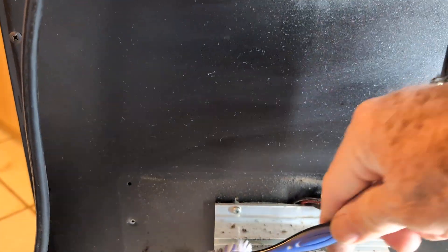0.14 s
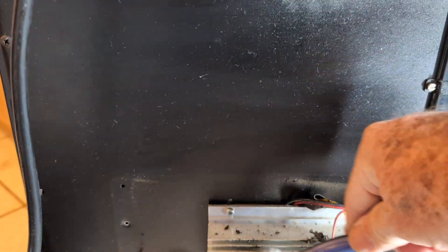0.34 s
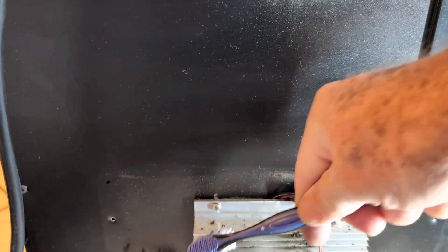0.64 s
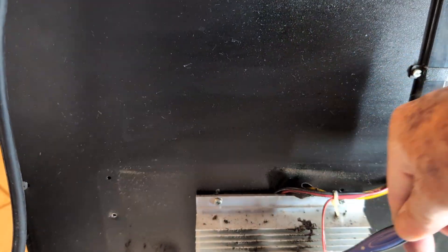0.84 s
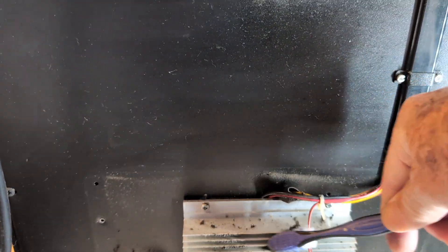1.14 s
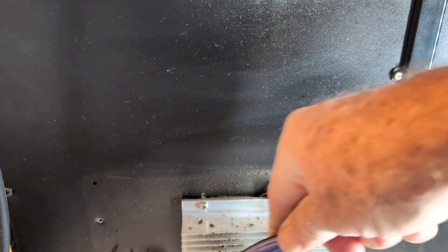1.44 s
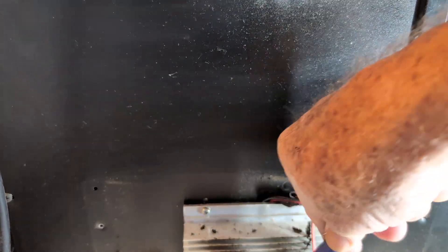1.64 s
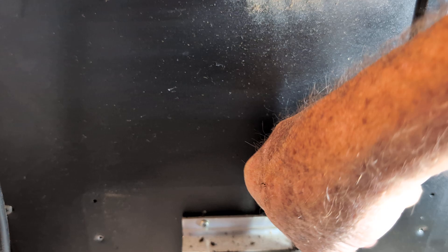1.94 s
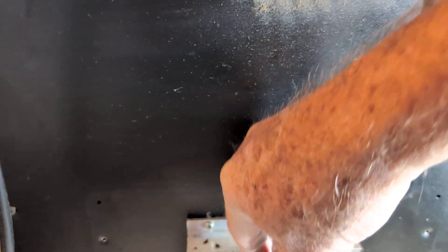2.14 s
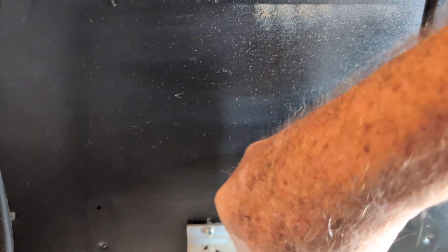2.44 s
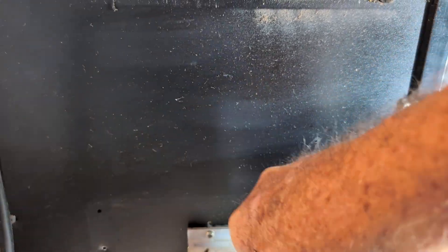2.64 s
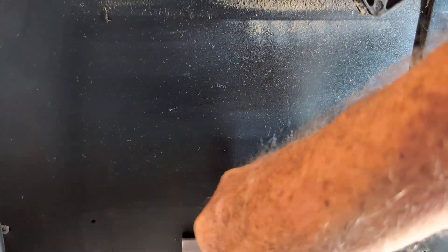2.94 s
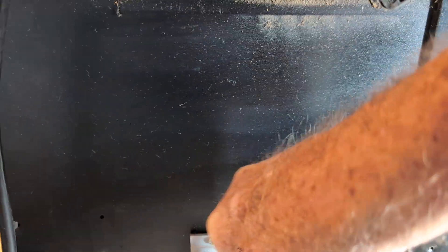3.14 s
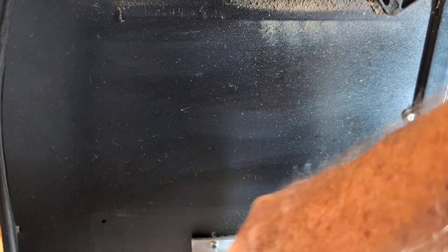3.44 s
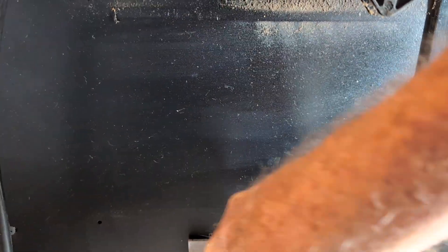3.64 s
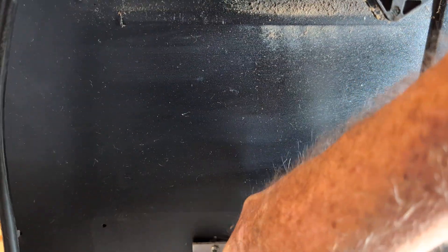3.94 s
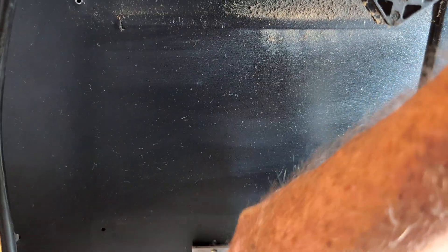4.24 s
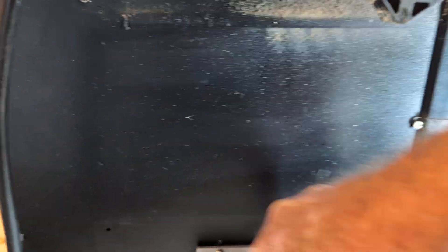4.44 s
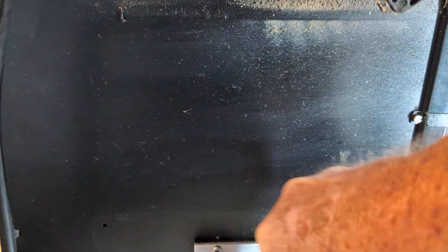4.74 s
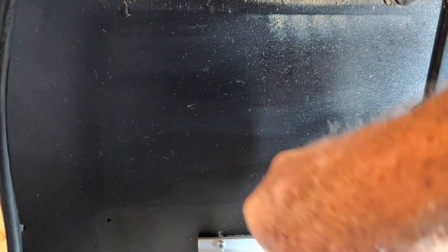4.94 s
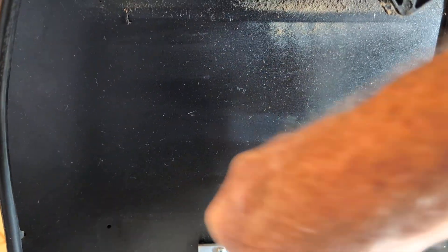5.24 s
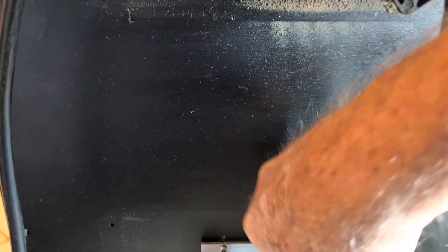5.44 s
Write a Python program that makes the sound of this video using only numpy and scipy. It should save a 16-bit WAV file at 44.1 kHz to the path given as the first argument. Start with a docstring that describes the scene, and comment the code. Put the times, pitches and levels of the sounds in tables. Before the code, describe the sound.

A small brush rasps and hisses over thin metal fins, slow strokes turning quick, above a steady low motor hum.

```python
"""A brush hisses and rasps over metal fins: a faint touch, some longer strokes, then mostly quick ones.
It is a toothbrush on the aluminium fins of a heat sink inside a sheet-metal cabinet, made of flicking noise.
Single fins sing as narrow bands of noise, the plastic head clicks on metal (noise bursts and ringing modes),
and the panel drones and booms when the hand bumps it.
Behind it all a motor hums low and steady in the workshop, with rumble, moving air and a thin fan whine."""
import sys
import numpy as np
from scipy import signal
from scipy.fft import rfft, irfft, next_fast_len
from scipy.io import wavfile
from scipy.ndimage import uniform_filter1d, map_coordinates

SR = 44100
rng = np.random.default_rng(int(sys.argv[2]) if len(sys.argv) > 2 else 0)


def generate_wav(signal):
    """Clip the signal to [-1, 1] and save it as 16-bit WAV at the path in sys.argv[1]."""
    frames = np.transpose(np.atleast_2d(signal))
    scaled = np.clip(frames, -1, 1) * 32767
    pcm = np.round(scaled).astype(np.int16)
    wavfile.write(sys.argv[1], SR, pcm)


N = 245842  # length in samples
TIME = np.arange(N) / SR  # s
TOP_HZ = 15850  # nothing is kept above this


def amp(db):
    """Turn decibels into a gain."""
    return 10 ** (np.asarray(db) / 20)


def unit(x):
    """Scale a sound to rms 1."""
    return x / np.sqrt(np.mean(x ** 2) + 1e-20)


def along(points, hz):
    """Read a curve of (f/Hz, value) points on a logarithmic frequency axis."""
    f, v = np.transpose(points)
    return np.interp(np.log(hz + 1), np.log(f + 1), v)


def curves(rows):
    """Draw straight lines between timed rows: one value per sample for each column after the time."""
    s, *columns = np.transpose(sorted(map(tuple, rows)))
    return [np.interp(TIME, s, column) for column in columns]


def wobble(rate):
    """Draw a smooth random curve with this many random points a second."""
    knots = rng.standard_normal(int(N * rate / SR) + 4)
    return map_coordinates(knots, [TIME * rate])


def filtered(x, response):
    """Change each frequency of x by a response given as a function of frequency in Hz."""
    n = x.shape[-1]
    m = next_fast_len(n + 8192)  # spare room for the filter's tail
    spectrum = rfft(x, m) * response(np.fft.rfftfreq(m, 1 / SR))
    return irfft(spectrum, m)[..., :n]


def add(track, s, sound):
    """Mix a sound into a track at time s."""
    part = track[round(s * SR):][:len(sound)]
    part += sound[:len(part)]


def rush(spectrum):
    """Make stereo noise of rms 1 that comes from all around, with nearly equal sides in the bass."""
    # how alike the two sides are: f/Hz, likeness (1 = the same)
    alike = [(60, 0.98), (130, 1), (280, 0.94), (550, 0.69), (1100, 0.043), (4000, 0.032)]

    def mid_side(hz):
        turn = np.arccos(np.clip(along(alike, hz), -1, 1)) / 2
        return amp(along(spectrum, hz)) * [np.cos(turn), np.sin(turn)]

    mid, side = filtered(rng.standard_normal((2, N)), mid_side)
    return unit(np.array([mid + side, mid - side]))


def workshop():
    """Motor hum of steady sine tones over a low rumble, moving air and a thin fan whine, all shaped noise."""
    # the motor's shaft line, then mains and frame tones: f/Hz, rms level/dB
    hum = [(57.45, -22), (42.3, -48.5), (81.4, -56), (87.5, -52.5), (121.4, -58), (142.3, -58), (169, -63),
           (287, -60), (459, -68), (802, -72.5), (862, -68.5)]
    # colours of the three noises: f/Hz, relative level per Hz/dB
    rumble = [(15, -38), (35, -21), (62, 9.5), (85, 6), (110, -1), (170, -14.5), (230, -50.5)]
    air = [(76, -32), (130, 1), (172, 2), (215, -9.5), (302, -5.5), (350, -7.5), (746, -12), (1200, -15.5),
           (2000, -19.5), (2600, -21), (4200, -28), (6500, -33), (10000, -58), (15800, -69)]
    fan_whine = [(2000, -65), (2440, -11.5), (2546, -1), (2650, -19), (3200, -64)]
    tones = sum(amp(db) * np.sqrt(2) * np.sin(2 * np.pi * (hz * TIME + rng.random())) for hz, db in hum)
    return tones + amp(-45.5) * rush(rumble) + amp(-52.5) * rush(air) + amp(-69.5) * rush(fan_whine)


def panel(drone_gain, attack_s):
    """The sheet metal drones under the strokes and booms softly in its own modes when bumped."""
    # the hand bumps the panel: t/s, relative level/dB
    bumps = [(0.726, -34), (0.765, -38), (2.384, -32.5), (2.752, -36), (2.792, -26), (2.824, -27.5),
             (3.04, -37), (3.574, -48), (3.691, -38), (4.846, -33)]
    # how the sheet rings: f/Hz, relative level/dB, time to fall 60 dB/s
    panel_modes = [(182, -5, 0.092), (245, -5, 0.11), (279, 4.5, 0.071), (337, -24, 0.044),
                   (635, -4, 0.024)]
    # colour of the drone: f/Hz, relative level per Hz/dB
    drone_colour = [(100, -39.5), (200, -10), (285, 2.5), (380, -4.5), (550, -11), (800, -13), (1400, -22),
                    (3000, -68)]
    hold_db = -56.5  # drone under the steadying hand, before the left-right balance
    booms = np.zeros(N)
    t = np.arange(SR // 4) / SR
    for s, db in bumps:
        ring = 0
        for hz, level, t60 in panel_modes:
            bent_hz = hz * (1 + rng.normal(0, 0.027))  # each bump rings at slightly different pitches
            ring = ring + amp(level - 60 * t / t60) * np.sin(2 * np.pi * bent_hz * t)
        add(booms, s, amp(db - 1.0) * ring * (1 - np.exp(-t / attack_s)))
    drone = np.hypot(drone_gain, amp(hold_db)) * rush(drone_colour)
    return (booms + drone) * amp([[-.8], [.8]])  # a little louder on the right


def clicks(ring_db, attack_s):
    """Plastic on metal: a short noisy crack, and the fin modes that lie in its band."""
    # the head clicks on metal: t/s, relative level/dB, centre f/Hz, width/octaves, crack's 60 dB fall/s
    taps = [(0.152, -46, 2880, 0.77, .025), (0.754, -32, 7670, 0.2, 0.024),
            (0.754, -39.5, 4570, 0.57, 0.028), (1.089, -42, 830, 0.55, 0.095),
            (1.474, -37.5, 3060, 1.8, 0.028), (1.477, -37.5, 700, 0.8, 0.064),
            (1.953, -43.5, 4200, 0.68, .02), (2.316, -44, 790, 0.97, 0.057), (2.316, -47, 2960, 0.74, .03),
            (2.604, -28, 6900, 1, 0.014), (2.6077, -23, 6500, 0.93, 0.016), (3.327, -44, 2330, 1, 0.07),
            (4.7796, -24.5, 2660, 1.5, 0.021), (4.795, -24, 8200, 0.13, 0.014),
            (4.797, -40, 2970, 1.3, 0.11), (4.824, -42, 5160, 0.39, 0.058),
            (5.051, -25.5, 8050, 0.64, 0.039), (5.338, -39.5, 7170, 2.4, 0.031)]
    # how the knocked fins ring: f/Hz, relative level/dB, time to fall 60 dB/s
    fin_modes = [(1943, -5.5, 0.1), (2910, 7, .018), (3850, -4, 0.07), (4220, -5, 0.017), (8200, -6, .045)]
    out = np.zeros(N)
    t = np.arange(SR // 6) / SR
    for s, db, centre_hz, octaves, t60 in taps:
        band = lambda hz: 1 / (1 + (np.log2((hz + 1) / centre_hz) / octaves) ** 4)
        crack = unit(filtered(rng.standard_normal(len(t)), band)) * amp(-60 * t / t60)
        ring = sum(band(hz) * amp(level - 60 * t / life) * np.sin(2 * np.pi * hz * t)
                   for hz, level, life in fin_modes)
        add(out, s, amp(db - 1.0) * (crack + amp(ring_db) * ring) * (1 - np.exp(-t / attack_s)))
    return out


def singing_fins():
    """A fin rings in narrow bands at its pitch and overtones while the bristles pass over it."""
    # single fins singing: start t/s, length/s, pitch f/Hz, level before the partial's own/dB
    singing = [(0.498, 0.23, 1125, -53), (.58, 0.16, 1480, -53), (0.636, 0.064, 2030, -51.5),
               (.895, 0.14, 1130, -51.5), (0.974, .14, 2320, -52.5), (1.234, 0.25, 1480, -47.5),
               (1.737, 0.27, 2360, -61), (2.166, 0.1, 4460, -56), (3.527, .14, 3190, -52.5),
               (3.665, 0.057, 3030, -56.5), (4.116, 0.08, 3050, -55), (4.258, .11, 3220, -59),
               (4.42, 0.16, 3200, -56), (4.584, .07, 3110, -53.5), (4.721, 0.097, 3140, -49),
               (5.05, 0.039, 3070, -49), (5.167, 0.11, 2590, -57), (5.323, 0.043, 2570, -48.5),
               (5.335, 0.48, 3380, -57.5)]
    # how any one fin rings: multiple of its pitch, width/Hz, relative level/dB
    fin_partials = [(1, 160, 2), (2.48, 350, -9.5), (6.3, 830, -2), (7.6, 2300, -0.5)]
    out = np.zeros(N)
    for start, length, pitch_hz, db in singing:
        n = round(length * SR)
        swell = np.sin(np.linspace(0, np.pi, n))
        for multiple, width_hz, partial_db in fin_partials:
            centre = multiple * pitch_hz

            def resonance(hz):
                damping = 1j * hz * width_hz
                return (damping / (centre ** 2 - hz ** 2 + damping)) ** 2

            ring = unit(filtered(rng.standard_normal(n), resonance))
            audible = centre < TOP_HZ
            add(out, start, amp(db + partial_db) * audible * ring * swell)
    return out


def flicks(rate, flick_db, clump_db, shared):
    """Bristles let go of the fin edges in tufts, over smooth friction; each side hears its own mix."""
    snaps = (rng.random((3, N)) < rate / SR) * rng.standard_normal((3, N))
    friction = rng.standard_normal((3, N)) + amp(flick_db) * unit(snaps)
    pair = np.sqrt(shared) * friction[0] + np.sqrt(1 - shared) * friction[1:]
    return unit(pair * amp(clump_db * wobble(170)))


def shifting(x, patchy_db):
    """As the brush moves on it meets other fins, so the colour drifts at random in narrow bands."""
    z = signal.stft(x, nperseg=512)[2]
    field = rng.standard_normal(z.shape)
    field = uniform_filter1d(field, size=3, axis=1)  # smooth over frequency
    field = uniform_filter1d(field, size=20, axis=2)  # smooth over time
    return signal.istft(z * amp(patchy_db * unit(field)), nperseg=512)[1][:, :N]


def scrape(near, far, excitation, patchy_db):
    """Bristle friction coloured by the resonances of the fins under the brush, rms about 1."""
    # resonances of the fin pack: f/Hz, width/Hz, lift at the near end/dB, lift at the far end/dB
    fin_pack = [(2130, 190, -1.5, -0.5), (2580, 250, -0.5, 5), (3130, 870, -5.5, 1.5), (3380, 130, -2.5, 7),
                (4330, 260, -2.5, 5), (5470, 400, 4, 4), (6590, 370, 1.5, 9), (8260, 180, 5.5, 7.5),
                (9300, 320, 4.5, 8), (10450, 430, 0.5, 7), (12700, 330, 8, 5), (14800, 500, 0, 3.5)]
    # where the brush works: t/s, place (0 = near end of the fins, 1 = far end)
    place = [(0, 0.16), (1.45, 0.14), (1.9, 0.73), (2.6, 0.69), (3.3, 0.53), (3.6, 0.96), (4.7, 0.77),
             (5.1, 0.8), (5.5, 0.84)]
    drifting = shifting(excitation, patchy_db)

    def colour(spectrum, end):
        lift = lambda hz: sum(db[end] / (1 + (2 * (hz - centre) / width) ** 2)
                              for centre, width, *db in fin_pack)
        return unit(filtered(drifting, lambda hz: amp(along(spectrum, hz) + lift(hz))))

    reach = curves(place)[0]
    return (1 - reach) * colour(near, 0) + reach * colour(far, 1)


def brush(hiss_gain, rasp_gain, brightening, tips_hz, unsteady_db):
    """Each stroke hisses at the bristle tips and rasps in the fins; harder strokes are brighter."""
    # colours at the two ends of the fins: f/Hz, relative level per Hz/dB
    hiss_near = [(3000, -42), (4100, -10.5), (4900, -16), (5600, -1), (6500, -6), (7600, -2), (9300, -1),
                 (10300, -2), (11500, -6), (12400, -6), (13800, -17.5), (14700, 4), (15800, -8)]
    hiss_far = [(3000, -46), (4100, -18.5), (4900, -8.5), (5600, -2), (6500, -8), (8100, 0.5), (9300, -7.5),
                (11000, -4), (12200, -11.5), (13600, -3), (14500, -1.5), (15800, -4)]
    rasp_near = [(350, -16), (700, -14.5), (1100, 0.5), (1500, -5.5), (2000, -2.5), (2400, -3.5),
                 (2800, -9), (3400, 4.5), (4300, -10.5), (5000, -18), (7000, -45)]
    rasp_far = [(350, -16), (700, 4.5), (1000, 4), (1400, -4), (2200, -4.5), (2700, -1.5), (3200, 1),
                (3800, -6.5), (5000, -25.5), (7000, -38)]
    # top treble as the bristles tilt: t/s, level before brightening/dB
    tip_sizzle = [(1.0, -1.5), (1.3, 2.5), (2.2, -1.5), (2.7, -1), (3.3, -1), (4.0, 4.5), (4.5, -0.5),
                  (5.1, 1.5)]
    bristles = flicks(rate=600, flick_db=-7, clump_db=1.5, shared=0.54)  # rate in snaps a second
    bristles = bristles * amp(unsteady_db * wobble(35))
    tips = scrape(hiss_near, hiss_far, bristles, patchy_db=3.5)
    top = filtered(tips, lambda hz: 1 - 1 / (1 + (hz / tips_hz) ** 8))  # the sizzle of the very tips
    hardness = hiss_gain / amp(-45.5)
    sizzle = amp(curves(tip_sizzle)[0]) * hardness ** brightening
    hiss = amp(3.0) * hiss_gain * (tips + top * (sizzle - 1))
    rasp = amp(1.5) * rasp_gain * scrape(rasp_near, rasp_far, bristles, patchy_db=2.5)
    return hiss + rasp


def pressure(start, length, crest, swell_db):
    """Gain of one stroke: the bristles bite, swell up to the crest, ease off and spring free."""
    attack_s, release_s = 0.0072, 0.012
    end = start + length
    crest_s = start + length * np.clip(crest, .05, .95)
    swell = np.interp(TIME, [start, crest_s, end], [-swell_db, 0, -swell_db])
    before = np.maximum(start + attack_s - TIME, 0) / attack_s
    after = np.maximum(TIME - end, 0) / release_s
    return amp(swell) * np.exp(-np.minimum(before + after, 20))


def scrubbing_levels():
    """Gains of hiss, rasp and panel drone: the strokes and the light drag around them add in power."""
    # brush strokes: start t/s, length/s, hardest point as a share of the length, swell up to it/dB,
    # then relative levels of bristle hiss/dB, fin rasp/dB, panel drone/dB
    strokes = [ (0.0, 0.099, 0.93, 1.5, -59, -58, -71), (0.489, 0.26, 0.64, 10, -42.5, -45.5, -46),
               (0.914, 0.18, 0.7, 11.5, -39, -44.8, -53), (1.231, 0.27, 0.4, 9.5, -50, -47, -53),
               (1.742, 0.19, 0.65, 22, -38, -44, -45.5), (2.089, 0.19, 0.63, 14.5, -43, -49.5, -71),
               (2.429, 0.036, .6, 1, -58.5, -68, -61), (2.511, 0.12, 0.25, 5.5, -40, -44.5, -44.5),
               (2.76, 0.085, .3, 1.5, -55.5, -55, -43), (2.862, 0.12, 0.88, 2, -49.5, -51.5, -47.5),
               (3.043, 0.14, 0.94, -0.5, -61.5, -59.5, -59), (3.223, 0.11, 0.41, 14.5, -43.5, -48, -51),
               (3.366, 0.082, .6, 7, -49, -51, -45.5), (3.534, 0.087, 0.63, 8.5, -40, -46, -47),
               (3.672, 0.12, 0.11, 12.5, -49.5, -50.5, -57), (3.832, 0.081, 0.34, 4, -47.5, -48.5, -46.5),
               (3.993, 0.06, .6, 17.5, -53.5, -61, -68), (4.104, 0.091, 0.78, 7.5, -45, -49.5, -52),
               (4.272, 0.086, 0.72, 11.5, -47.5, -57, -51), (4.417, 0.12, 0.97, 6, -43, -48, -50),
               (4.586, 0.057, .45, 10, -43.5, -52.5, -46), (4.725, .075, 0.62, 11.5, -39.5, -43.5, -45.5),
               (4.804, .11, 0.86, 1, -51.5, -55, -55), (5.024, 0.12, 0.19, 18, -42.5, -43, -44),
               (5.159, 0.11, 0.29, 12, -45, -48.5, -54), (5.328, 0.071, 0.23, 6.5, -38, -44.5, -50),
               (5.43, 0.16, 0.42, 6.5, -46.5, -50.5, -51)]
    # bristles rest on the fins and drag lightly: start t/s, end t/s, then the same three levels/dB
    resting = [(1.05, 1.144, -55.5, -56.5, -53), (1.5, 1.74, -70.5, -64, -58), (1.742, 1.95, -59, -63, -57),
               (2.1, 5.2, -61, -64.5, -54)]
    panel_lag_s, panel_swell = 0.021, 0.89  # the drone trails the stroke and swells less
    power = np.zeros((3, N))
    for start, length, crest, swell_db, hiss_db, rasp_db, drone_db in strokes:
        push = pressure(start, length, crest, swell_db)
        late_push = pressure(start + panel_lag_s, length, crest, panel_swell * swell_db)
        power[:2] += np.outer(amp([hiss_db, rasp_db]), push) ** 2
        power[2] += (amp(drone_db) * late_push) ** 2
    for start, end, *levels_db in resting:
        power += np.outer(amp(levels_db), pressure(start, end - start, .5, 0)) ** 2
    return np.sqrt(power)


def cabinet(pair, wet_db, t60):
    """The direct upper treble reaches the right side first; close metal walls answer each side differently."""
    # how late the left side hears the direct sound: f/Hz, delay/s
    left_lag = [(1500, 0), (2400, -.00004), (3400, 0), (4200, .00043)]
    # left level minus right level: f/Hz, level/dB
    balance = [(300, -4), (900, 3), (3200, 1.5), (3900, 0), (5300, -7.5), (6500, -4), (9000, -3.5),
               (11300, -2.5), (12600, -2), (14500, 3.5)]
    t = np.arange(SR // 8) / SR
    paths = rng.standard_normal((2, len(t))) * amp(-60 * t / t60)  # dying random echoes
    paths = paths / np.linalg.norm(paths, axis=1, keepdims=True)
    walls = signal.fftconvolve(pair, paths, axes=1)[:, :N]
    direct = filtered(pair, lambda hz: np.exp(-2j * np.pi * np.outer([1, 0], hz * along(left_lag, hz))))
    heard = (direct + amp(wet_db) * walls) / np.hypot(1, amp(wet_db))
    return filtered(heard, lambda hz: amp(np.outer([.5, -.5], along(balance, hz))))


def scene():
    """Brush, singing fins and clicks inside the cabinet, over the panel and the workshop."""
    hiss, rasp, drone = scrubbing_levels()
    background = workshop() + panel(drone, attack_s=0.0028)
    knocks = np.tile(clicks(ring_db=-7, attack_s=.0003), (2, 1))  # the same on both sides
    knocks = cabinet(knocks, wet_db=-7, t60=.06)
    strokes = brush(hiss, rasp, brightening=0.13, tips_hz=11500, unsteady_db=1.3)
    scrubbing = cabinet(strokes + singing_fins(), wet_db=-6, t60=.04)
    return background + knocks + scrubbing


def record(dry):
    """Keep only the sound below the top frequency."""
    return filtered(dry, lambda hz: hz < TOP_HZ)


dry = scene()
out = record(dry)
generate_wav(out)
```